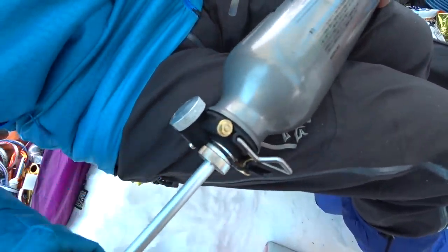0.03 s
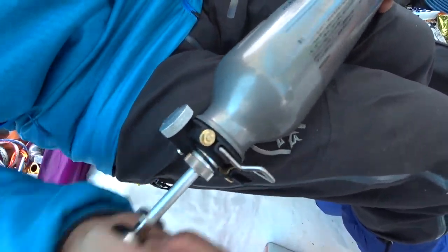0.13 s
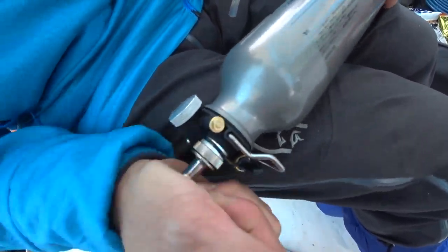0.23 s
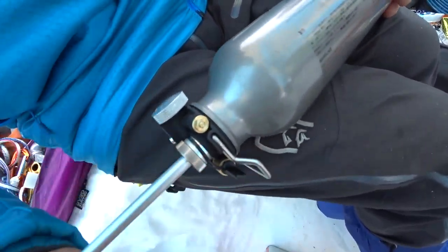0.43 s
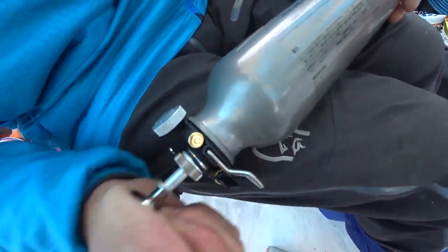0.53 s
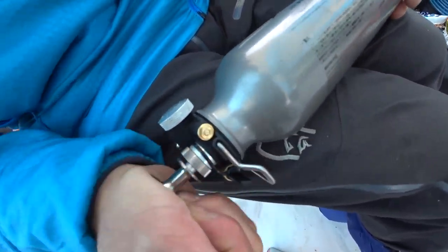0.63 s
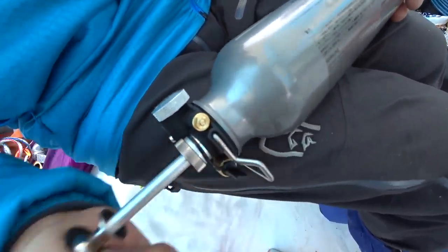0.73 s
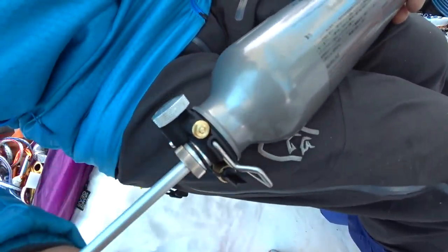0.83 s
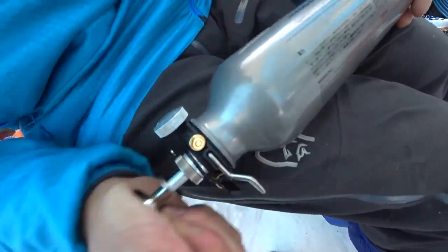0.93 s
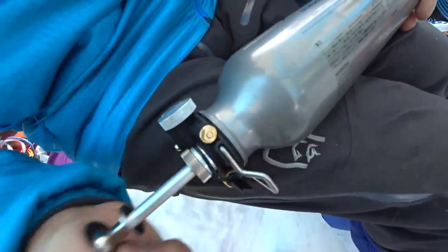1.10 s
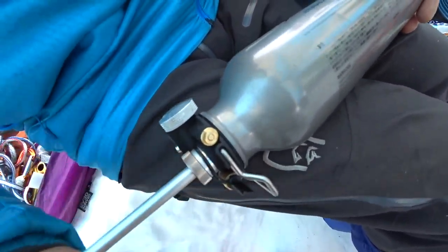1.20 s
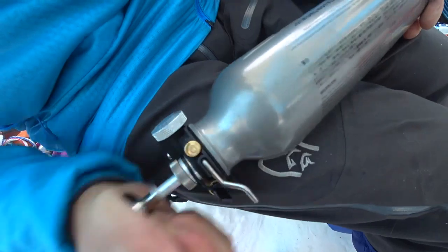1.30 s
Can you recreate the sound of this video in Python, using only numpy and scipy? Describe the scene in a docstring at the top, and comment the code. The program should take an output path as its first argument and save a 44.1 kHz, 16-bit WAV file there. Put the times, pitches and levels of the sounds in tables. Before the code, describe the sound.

A hand pumps the plunger of a metal fuel bottle close by, knocking at about 0.2, 0.6 and 1.0 seconds. Just before each knock, air rasps briefly through the valve; then the plunger hits its stop and the bottle gives a short, thin ring. Between strokes the rod slides with faint ticks and a jacket sleeve rustles. A soft, steady rush of wind lies behind it throughout.

```python
"""Pumping a fuel bottle in wind

A hand pumps the plunger of a metal fuel bottle three times, outdoors in a steady rush of wind.
At the bottom of each stroke air rasps through the chattering check valve, then the plunger hits its
stop and the bottle rings briefly. Between strokes the rod slides and a jacket sleeve rustles."""
import sys
import numpy as np
from scipy import signal
from scipy.fft import rfft, irfft
from scipy.io import wavfile
from scipy.ndimage import uniform_filter1d

SR = 44100
rng = np.random.default_rng(int(sys.argv[2]) if len(sys.argv) > 2 else 0)


def wrap_up_sound(samples):
    """Save the sound to the file named by the first command line argument, as 16-bit audio."""
    columns = np.atleast_2d(samples).T
    # keep every value between -1 and 1, then stretch to whole-number steps
    tamed = np.clip(columns, -1, 1)
    steps = np.round(tamed * 32767).astype(np.int16)
    wavfile.write(sys.argv[1], SR, steps)


N = 59535
T = np.arange(N) / SR
HZ = np.fft.rfftfreq(2 * N, 1 / SR)
BAND_EDGE_HZ = 11150


def amp(db):
    """Decibels to gain."""
    return 10 ** (np.asarray(db) / 20)


def unit_rms(x):
    """Scale to rms 1."""
    return x / np.sqrt(np.mean(x ** 2) + 1e-20)


def curve_db(points):
    """Interpolate a table over log frequency."""
    freq_hz, db = np.transpose(points)
    return np.interp(np.log(HZ + 1), np.log(freq_hz + 1), db)


def band(centre_hz, width_oct):
    """Gaussian band over log frequency."""
    return np.exp(-.5 * (np.log2((HZ + 1) / centre_hz) / width_oct) ** 2)


def resonance(centre_hz, width_hz):
    """Resonance shape, 1 at its top."""
    return 1 / (1 + (2 * (HZ - centre_hz) / width_hz) ** 2)


def colour(x, gain):
    """Minimum-phase filter that keeps the power of white noise; rolls off above the band edge."""
    rolloff = np.where(HZ > BAND_EDGE_HZ, BAND_EDGE_HZ / (HZ + 1), 1) ** 12
    gain = np.maximum(unit_rms(gain * rolloff), 1e-5)
    log_gain = np.log(np.r_[gain, gain[-2:0:-1]])
    response = np.exp(np.conj(signal.hilbert(log_gain)))[:N + 1]
    return irfft(rfft(x, 2 * N) * response)[:N]


def noise():
    """White noise."""
    return rng.standard_normal(N)


def drift(span_s):
    """Smooth random wander, rms 1."""
    size = max(int(span_s * SR), 1)
    return unit_rms(uniform_filter1d(uniform_filter1d(noise(), size), size))


def decay(start_s, t60_s):
    """Sudden start, exponential fall."""
    return (T >= start_s) * np.exp(-np.log(1000) * np.maximum(T - start_s, 0) / t60_s)


def mode(start_s, pitch_hz, t60_s):
    """One struck metal mode: a damped sine of random polarity."""
    return decay(start_s, t60_s) * np.sin(2 * np.pi * pitch_hz * (T - start_s)) * rng.choice([-1, 1])


# Wind spectrum: freq_hz, density_db
WIND_SPECTRUM = [(25, -46), (60, -33), (110, -29.5), (170, -18), (250, -7), (380, -9.5), (520, -1),
                 (660, 3), (900, -0.5), (1400, -14), (2000, -17), (2750, -8.5), (3100, -2), (3500, -5),
                 (4200, -3.5), (5100, -14), (6100, -13), (6900, -4), (8500, -16.5), (9500, -18),
                 (11000, -14)]
# Whistles in the rush: centre_hz, width_hz, boost_db
WIND_WHISTLES = [(636, 23, 3), (3020, 73, 3.5), (4230, 82, 4.5)]


def wind(level_db=-42, waver_db=1.2):
    """A steady, slightly wavering rush with faint narrow whistles."""
    whistles_db = sum(db * resonance(hz, width_hz) for hz, width_hz, db in WIND_WHISTLES)
    envelope = amp(level_db + waver_db * drift(0.035))
    return envelope * colour(noise(), amp(curve_db(WIND_SPECTRUM) + whistles_db))


# Rod and sleeve friction envelope: time_s, level_db
SLIDE_ENVELOPE = [(0, -47.5), (.11, -51.5), (.14, -51.5), (.205, -37), (.275, -45.5), (.335, -43),
                  (.46, -49.5), (.52, -49.5), (.58, -39.5), (.655, -50), (.72, -45), (.86, -53), (.93, -49),
                  (.975, -41), (1.06, -48.5), (1.15, -48.5), (1.21, -63), (1.31, -51.5), (1.345, -37.5)]
# Friction spectrum: freq_hz, density_db
CLOTH_SPECTRUM = [(100, -35.5), (500, -1), (1200, 0), (2000, 3.5), (3000, -1), (5500, -1.5), (8000, -2),
                  (11000, -1.5)]
# Plunger drawn back: centre_s, width_s, level_db
RETURN_SWISHES = [(.04, 0.026, -49.5), (.355, 0.019, -48), (.755, 0.019, -43.5), (1.16, 0.045, -45.5)]


def rustle(grain_db=2):
    """Grainy friction swells into each stroke; a thin swish follows on the way back."""
    slide = amp(np.interp(T, *np.transpose(SLIDE_ENVELOPE)) + grain_db * drift(0.0036))
    friction = colour(noise() * slide, amp(curve_db(CLOTH_SPECTRUM)))
    swish = sum(amp(db) * np.exp(-.5 * ((T - centre_s) / width_s) ** 2)
                for centre_s, width_s, db in RETURN_SWISHES)
    return friction + colour(noise() * swish, band(10300, width_oct=.13))


# Rod and sleeve ticks: start_s, level_db, centre_hz, t60_s, clink_db
ROD_TICKS = [(0.0951, -33.5, 6830, 0.035, -36), (0.1954, -34, 2300, 0.03, -41),
             (0.3484, -31.5, 9500, 0.018, -57), (0.7835, -37.5, 2300, 0.023, -39),
             (1.1502, -36, 8600, 0.042, -56), (1.166, -42.5, 2000, 0.044, -46),
             (1.2914, -39.5, 8000, .015, -62)]


def tick(start_s, level_db, centre_hz, t60_s, clink_db):
    """A small dry scrape with a faint clink of the rod."""
    clink = amp(clink_db) * mode(start_s, pitch_hz=2124, t60_s=0.038)
    spectrum = band(centre_hz, width_oct=0.26) + 0.46 * amp(curve_db(CLOTH_SPECTRUM))
    return clink + amp(level_db) * colour(noise() * decay(start_s, t60_s), spectrum)


# Plunger hits and small rebounds: start_s, crack_db, ring_db, t60_ratio, pitch_ratio, head_db
STOP_HITS = [(0.2320, -15, -23, 0.98, 1.004, -12.5), (0.246, -31, -31, 1, 1.004, -23),
             (0.6167, -11.5, -18.5, 0.87, .999, -30), (1.0151, -11.5, -17, 0.5, 1.008, -27),
             (1.025, -27, -27, 0.53, 1.16, -18)]
# Bottle modes: pitch_hz, level_db, t60_s
BOTTLE_MODES = [(1860, -4.5, .16), (2488, -3, 0.063), (2763, -10.5, 0.083), (3490, 2.5, 0.03),
                (3873, -10.5, 0.064), (3946, -3, 0.05), (4360, -4, 0.054), (4990, -6.5, 0.049),
                (5740, -6.5, 0.044), (6900, -23, 0.068), (7980, -23, 0.04), (10550, -14, 0.038)]
# Spectrum of the crack and of the valve's spit: freq_hz, density_db
CRACK_SPECTRUM = [(50, -43), (300, -34), (850, -14), (1250, 1), (2000, -3), (2900, -2), (3700, 0.5),
                  (5200, -2.5), (7600, -3), (9300, -9), (11000, -3)]


def knock(start_s, crack_db, ring_db, t60_ratio, pitch_ratio, head_db, low_cut_hz=1440):
    """The plunger hits its stop: crack, clatter, thin ring of the hand-damped bottle and pump head."""
    impact = decay(start_s, t60_s=0.0095)
    clatter = amp(-14.5) * decay(start_s, t60_s=0.077)
    crack = colour(noise() * (impact + clatter), amp(curve_db(CRACK_SPECTRUM)))
    bottle = sum(amp(ring_db + db) * mode(start_s, hz * pitch_ratio, t60_s * t60_ratio)
                 for hz, db, t60_s in BOTTLE_MODES)
    head = amp(head_db) * mode(start_s, pitch_hz=1984, t60_s=0.05 * t60_ratio)
    ring = signal.lfilter(*signal.butter(2, low_cut_hz, "high", fs=SR), bottle + head)
    return amp(crack_db) * crack + ring


def chatter(start_s, rate_hz=760.7, jitter=.18, spread_db=0.5, air_share=0.55):
    """The valve flutters in uneven snaps, each letting a puff of air through."""
    gap, strength = rng.standard_normal((64, 2)).T
    snap_s = start_s + np.cumsum(np.exp(jitter * gap)) / rate_hz
    snap_index = np.minimum((snap_s * SR).astype(int), N - 1)
    snaps = np.zeros(N)
    snaps[snap_index] = unit_rms(amp(spread_db * strength)) * np.sqrt(SR / rate_hz)
    puff_shape = decay(0, t60_s=0.0063)[:SR // 20] ** 2
    puff_power = signal.oaconvolve(snaps ** 2, puff_shape / puff_shape.sum())[:N]
    puffs = np.sqrt(abs(puff_power)) * noise()
    return np.sqrt(1 - air_share) * snaps + np.sqrt(air_share) * puffs


def tube_tone(pitch_hz, level_db, wander_hz=26.45):
    """A hollow tone of the pump tube, unsteady in pitch."""
    freq_hz = pitch_hz + wander_hz * drift(0.0029)
    return amp(level_db) * np.sin(2 * np.pi * np.cumsum(freq_hz) / SR)


# Air through the valve:
# start_s, length_s, level_db, fade_db, rasp_hz, treble_db, hollow_hz, hollow_db, upper_db, low_db
AIR_BURSTS = [(0.2151, 0.015, -14.5, -3, 8100, 5.5, 715.3, -30.5, -32, -48),
              (0.5866, 0.028, -15.5, -0.5, 7730, -3, 637, -30.5, -35, -40.5),
              (0.983, 0.03, -15, -9.5, 7840, -2, 690, -23.5, -42, -43.5)]
# Valve spectrum: freq_hz, density_db
VALVE_SPECTRUM = [(40, -41), (130, -30), (260, -22.5), (480, -16), (1050, -23.5), (1600, -17), (2300, -10),
                  (3100, -18.5), (3800, -9.5), (4500, -4.5), (5100, -15), (6400, -10), (7500, -4.5),
                  (9300, -8), (10300, -9), (11000, -7)]
# Resonances of the pump's metal parts: centre_hz, width_hz, boost_db
METAL_RESONANCES = [(3730, 150, 3), (4750, 160, 2.5), (5666, 72, 14), (6850, 73, 5), (8310, 84, 10.5),
                    (9030, 190, 8.5), (9630, 120, 9), (10760, 180, 5.5)]


def valve(start_s, length_s, level_db, fade_db, rasp_hz, treble_db, hollow_hz, hollow_db,
          upper_db, low_db, open_s=0.0027, close_s=0.0015):
    """The check valve spits open and chatters into the metal pump; the tube adds hollow tones."""
    age_s = T - start_s
    opening = np.clip(age_s / open_s, 0, 1)
    closing = np.clip((length_s - age_s) / close_s + .5, 0, 1)
    gate = opening * closing * amp(fade_db * np.clip(age_s / length_s, 0, 1) ** 2)
    body_db = curve_db(VALVE_SPECTRUM) + treble_db * band(4540, width_oct=0.23)
    body_db += 13 * resonance(rasp_hz, width_hz=110)
    body_db += sum(db * resonance(hz, width_hz) for hz, width_hz, db in METAL_RESONANCES)
    rasp = amp(level_db) * colour(gate * chatter(start_s), amp(body_db))
    tones = tube_tone(hollow_hz, hollow_db) + tube_tone(820, upper_db) + tube_tone(263.5, low_db)
    spit = amp(-24.5) * colour(noise() * decay(start_s, t60_s=0.0052), amp(curve_db(CRACK_SPECTRUM)))
    flutter_db = 2 * drift(0.0021)
    return spit + rasp + gate ** 2 * tones * amp(flutter_db)


def pump():
    """Three strokes: valve air, knocks on the stop, rod and sleeve noise."""
    air = sum(valve(*row) for row in AIR_BURSTS)
    knocks = sum(knock(*row) for row in STOP_HITS)
    ticks = sum(tick(*row) for row in ROD_TICKS)
    return air + knocks + ticks + rustle()


def stereo(mid, side, balance, side_levels):
    """Spread a sound over two close microphones; the side signal decorrelates them."""
    common = rfft(mid, 2 * N)
    diffuse = rfft(side, 2 * N) * amp(curve_db(side_levels))
    lean = amp(curve_db(balance) / 2)
    channels = np.array([(common + diffuse) * lean, (common - diffuse) / lean])
    return irfft(channels * 2 / (lean + 1 / lean))[:, :N]


# Left over right: freq_hz, balance_db
PUMP_BALANCE = [(100, 5), (350, -1.5), (630, -4.5), (2000, -3), (3700, -4.5), (6500, -2.5), (10000, 0.9)]
WIND_BALANCE = [(100, 0), (300, -2), (700, -4), (2000, -3.5), (4000, -4.5), (7000, -2.5), (11000, 1.5)]
# Side signal against mid: freq_hz, level_db
PUMP_WIDTH = [(100, -25), (700, -12.5), (2000, -9), (4000, -11.5), (8000, -15.5), (11000, -10)]
WIND_WIDTH = [(50, -5), (150, -15.5), (700, -13.5), (2000, 1), (4000, -7), (11000, -4.5)]


def scene():
    """The pump close by, the wind behind it."""
    foreground = stereo(pump(), pump(), PUMP_BALANCE, PUMP_WIDTH)
    background = stereo(wind(), wind(), WIND_BALANCE, WIND_WIDTH)
    return foreground + background


def record(dry, threshold_db=-28, attack_s=.025, recover_db_per_s=143, ceiling=.62, low_cut_hz=85):
    """Mild gain control ducks the mix at each stroke; peaks are rounded and the band is limited."""
    pole = np.exp(-1 / (attack_s * SR))
    power_db = 10 * np.log10(signal.lfilter([1 - pole], [1, -pole], (dry ** 2).mean(0)) + 1e-12)
    fall_db = recover_db_per_s * T
    held_db = np.maximum.accumulate(power_db + fall_db) - fall_db
    ducked = dry * amp(-0.19 * np.maximum(held_db - threshold_db, 0))
    rounded = ducked / (1 + abs(ducked / ceiling) ** 5) ** (1 / 5)
    thinned = signal.lfilter(*signal.butter(2, low_cut_hz, "high", fs=SR), rounded)
    lowpass = signal.firwin(301, BAND_EDGE_HZ, window=("kaiser", 5), fs=SR)
    return signal.oaconvolve(thinned, lowpass[None], "same")


dry = scene()
out = record(dry)
wrap_up_sound(out)
```